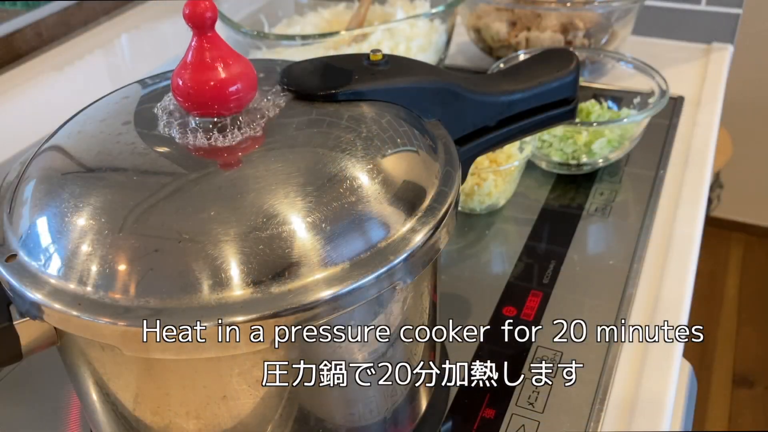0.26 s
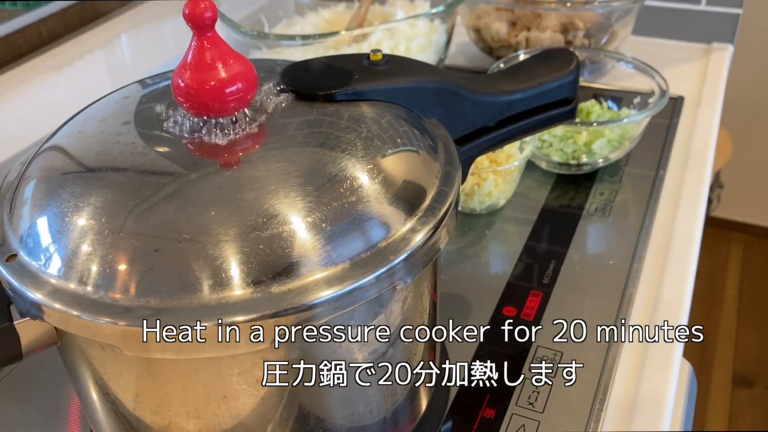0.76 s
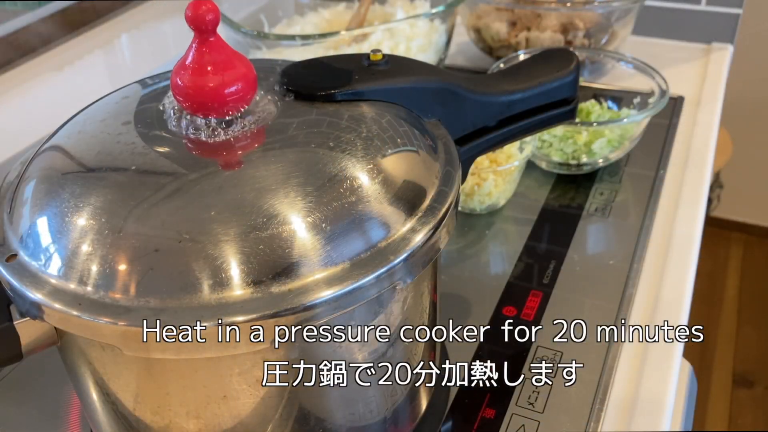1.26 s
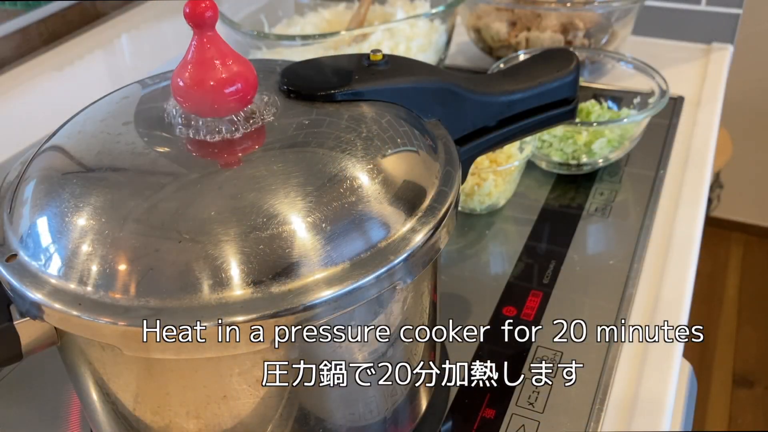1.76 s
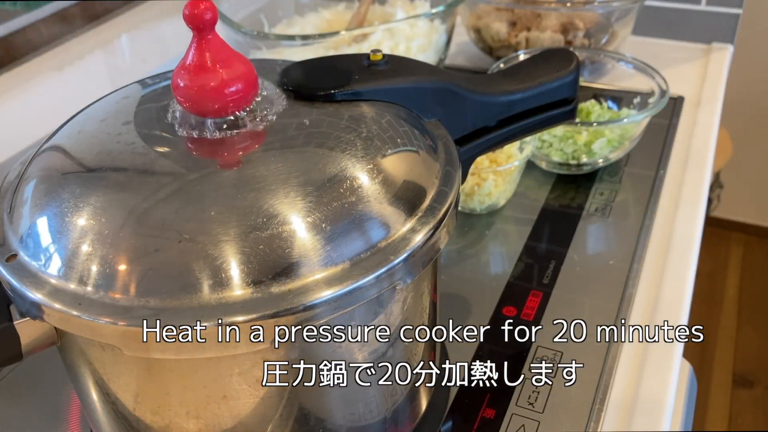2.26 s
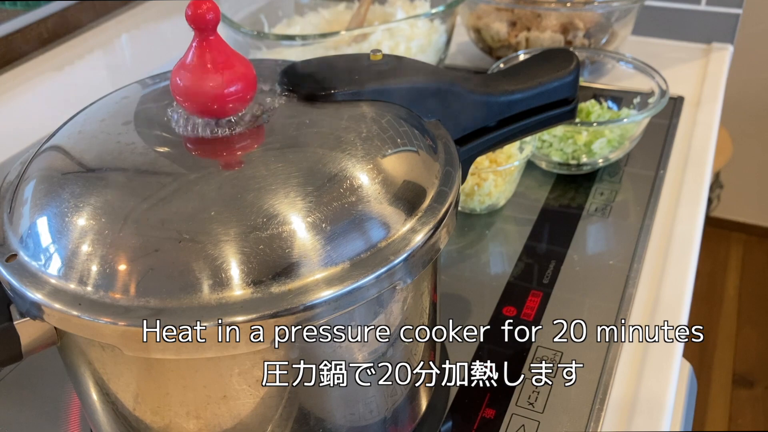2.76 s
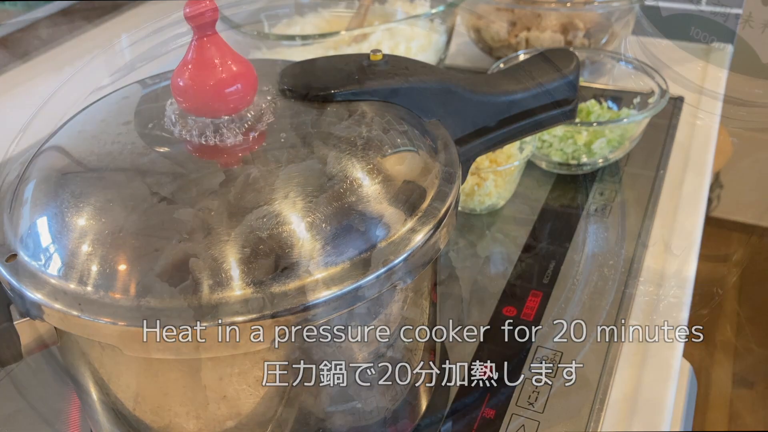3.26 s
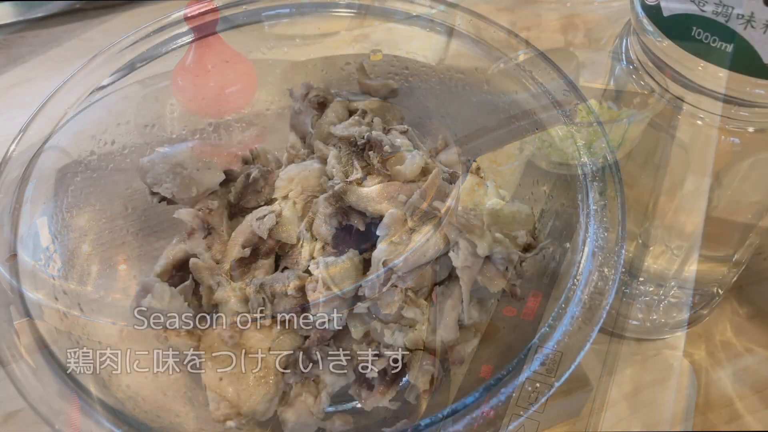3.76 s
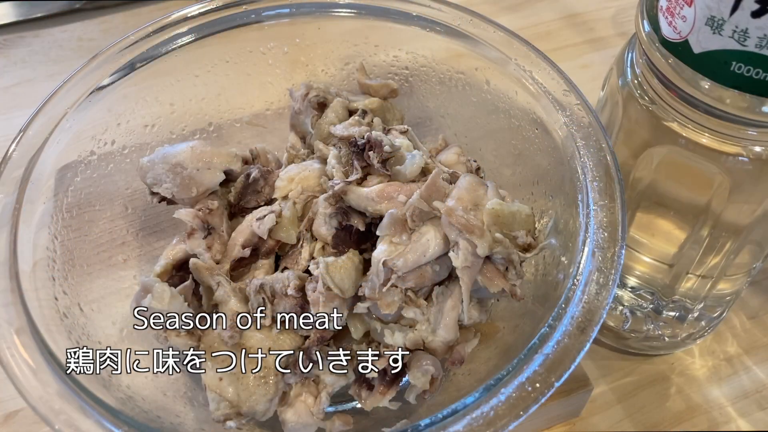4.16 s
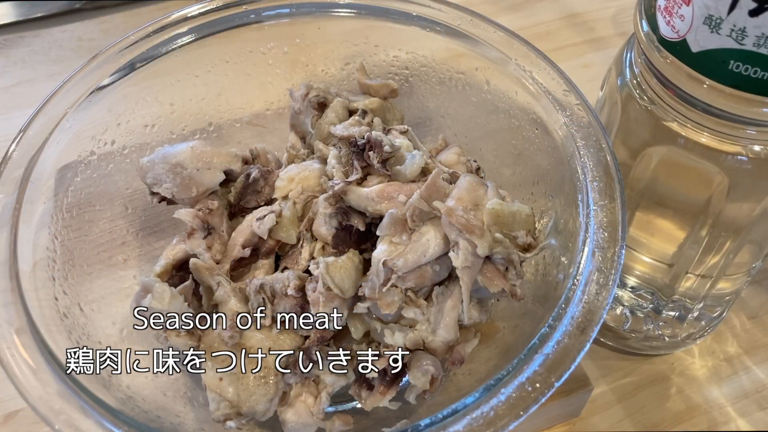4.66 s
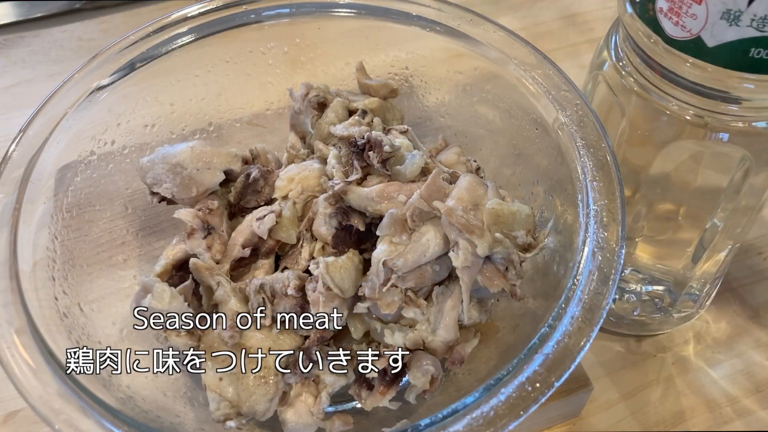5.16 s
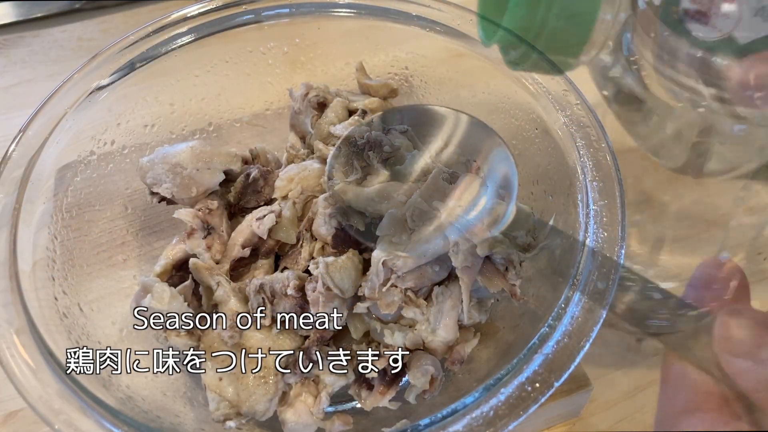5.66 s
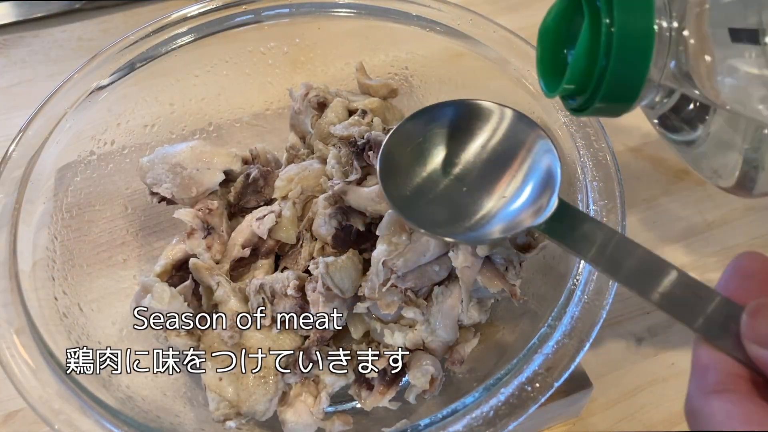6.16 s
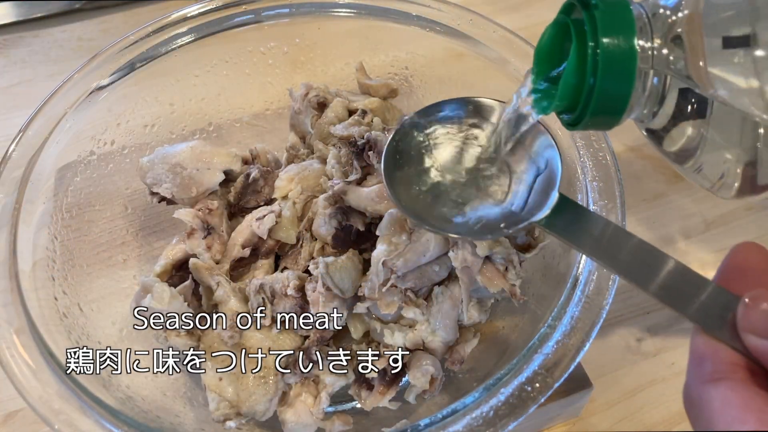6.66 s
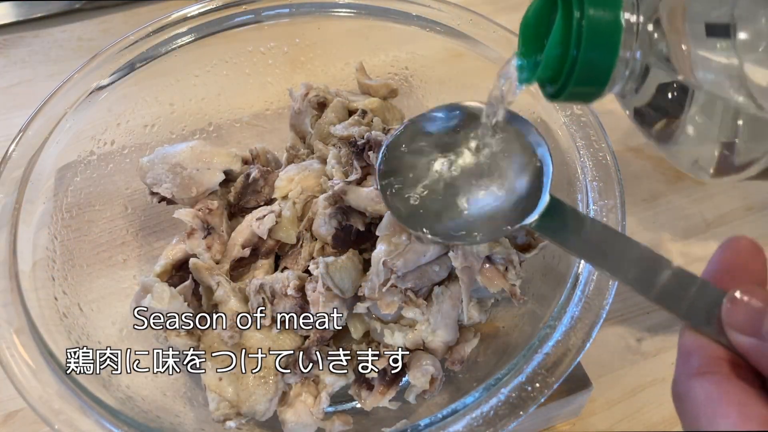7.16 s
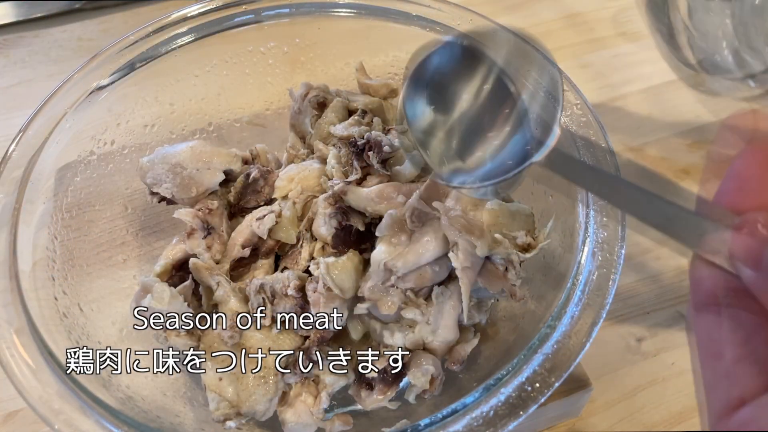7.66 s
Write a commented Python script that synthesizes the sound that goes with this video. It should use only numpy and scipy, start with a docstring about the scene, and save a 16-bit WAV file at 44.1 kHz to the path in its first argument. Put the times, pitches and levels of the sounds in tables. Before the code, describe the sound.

Rapid chattering steam jets, bubbly and sizzling, fill the first few seconds beside a hob, with occasional sharper spits. They die out and a low ventilation hum remains, slightly fuller. One sharp plastic snap follows with a small hollow bottle thud and short room reflections. Near the end, faint pouring and tiny ringing drips give way to a brief splash onto meat in a glass bowl. Close handheld phone pickup, indoors.

```python
"""A pressure cooker's weight rocks on its vent 11 to 14 times a second; noise jets pulse as wet puffs, then fade.
A flip cap then creaks and snaps open: slips excite its damped modes, and the bottle answers with a soft thump.
Last, liquid is poured into a steel spoon and tipped onto meat in a glass bowl: ringing bubbles and pattering noise.
Fan noise and motor tones of a small kitchen run throughout, heard by a phone's two microphone ports."""
import sys
import numpy as np
from scipy import signal
from scipy.fft import rfft, irfft
from scipy.io import wavfile

SR = 44100
rng = np.random.default_rng(int(sys.argv[2]) if len(sys.argv) > 2 else 0)


def store_wav(level_fs):
    """Save 16-bit WAV to argv[1]."""
    pcm = np.round(np.clip(np.atleast_2d(level_fs), -1, 1) * 32767)
    wavfile.write(sys.argv[1], SR, pcm.T.astype(np.int16))


N = 349272
T, HZ = np.arange(N) / SR, np.fft.rfftfreq(N, 1 / SR)
SIDES = np.array([[1], [-1]])  # left, right
TOP_HZ = 11900

# steam at a lift: start_s, flow_db, wetness_db (body over hiss), lean_db (extra opening to one side)
PRESSURE = [(0, -26.5, -5, -2), (0.33, -35, -5, 2), (0.46, -36.5, -3, -0.5), (0.74, -35.5, -6.5, 2),
            (0.95, -39.5, -8.5, -2.5), (1.4, -37, -9.5, -2), (1.55, -33.5, -7, 1.5), (1.79, -37, -7.5, 4.5),
            (1.9, -34, -2, 2.5), (2.15, -36.5, -4, 0), (2.6, -35.5, -8, -1), (3.1, -37, -6.5, 1),
            (3.3, -36.5, -7.5, 1.5), (3.76, -40.5, -3, -0.5), (3.85, -52.5, -4, 0.5)]
# runs of liquid into the spoon, over its rim, onto the meat: start_s, rel_level_db, hold_s, t60_s
RUNS = [(6.449, -80, 0.65, 0.2), (7.164, -66.5, 0.066, 0.35), (7.332, -52, 0.0067, 0.33),
        (7.381, -53, 0.11, 0.8)]


def steam(hiss_db=-0.14, body_db=-0.14, gurgle_db=-18.5, gurgle_follow=0.74, froth_db=-6, spit_db=5):
    """Each lift of the weight opens the jet; water caught in the gap froths, spits and gurgles."""
    # leak between lifts: time_s, rel_hiss_db, rel_body_db
    leak = [(0, -60, -51.5), (3.2, -73, -51.5), (3.85, -60, -64), (4.05, -74, -76)]
    # weight jumps high or hangs open: peak_s, rel_hiss_db, rel_body_db, half_length_s
    gushes = [(0.697, -38, -45, 0.013), (1.142, -36.5, -44, 0.018), (1.586, -38, -39, 0.029),
              (1.87, -42, -44, 0.015), (2.053, -26, -34, 0.01), (2.472, -30, -36, 0.013),
              (2.782, -33, -34.5, 0.018), (2.857, -26, -36, 0.011), (2.924, -27, -36.5, 0.016)]
    # jet colours: freq_hz, rel_level_db
    hiss_outline = [(3300, -37), (4600, -15), (5400, -2), (6700, 2), (7300, 2.5), (8500, 6.5), (10000, 2),
                    (11400, -2), (12000, -26)]
    body_outline = [(1500, -13.5), (2100, -10), (2450, 3.5), (3200, 0.5), (3900, -1), (4600, -4.5),
                    (5500, 4.5), (7000, -38)]
    gurgle_outline = [(150, -21.5), (400, -7.5), (700, -4), (1200, 2.5), (1900, 1.5), (2600, 1),
                      (4000, -52.5)]
    # resonances of vent and weight: freq_hz, width_hz, rel_level_db
    vent_peaks = [(2396, 50, 5.5), (2871, 46, 9.5), (3340, 38, -1), (3570, 95, -2), (4484, 25.5, 18.5),
                  (4940, 29, 10), (6630, 34, -8)]
    # stereo balance: freq_hz, left_minus_right_db
    steam_pan = [(400, 2.5), (1100, -1.5), (2300, -5), (2900, -3.5), (3600, 1), (4500, 1), (6000, 0)]
    # sharp spits at the start of a lift: start_s, rel_level_db
    spit_hits = [(0.145, -19), (1.522, -24), (1.965, -33), (2.044, -16), (2.123, -27), (2.4625, -13),
                 (2.468, -14), (2.76, -19), (2.847, -26), (3.503, -26), (3.671, -26)]
    # spit colour: freq_hz, rel_level_db
    spit_outline = [(400, -11), (1300, -12), (2700, -21), (4500, -36), (7000, 2), (9000, 3), (10500, 12),
                    (12000, -7)]
    open_share, shut_share = 0.88, 1.08  # a puff rises faster than it dies: flanks as shares of half-length

    hiss_power = amp(curve(leak)) ** 2
    body_power = amp(curve(leak, axis=2)) ** 2
    for peak_s, high_db, low_db, half_s in lifts() + list(gushes):
        flank_s = half_s * np.where(T < peak_s, open_share, shut_share)
        opening = 1 / np.cosh(np.clip((T - peak_s) / flank_s, -20, 20))
        hiss_power = hiss_power + (amp(high_db) * opening) ** 2
        body_power = body_power + (amp(low_db) * opening) ** 2

    jet_noise = spread(fizz(rate_hz=2700, scatter_db=2.0, smooth_db=0.0), steam_pan)
    jet = unit(colour(jet_noise, hiss_outline, vent_peaks))
    vent_noise = spread(fizz(rate_hz=900, scatter_db=2.5, smooth_db=0.5), steam_pan)
    vent = unit(colour(vent_noise, body_outline, vent_peaks))
    water_noise = spread(fizz(rate_hz=500, scatter_db=1.0, smooth_db=1.5), steam_pan)
    water = unit(colour(water_noise, gurgle_outline))
    bubbles = froth((0, leak[-1][0]), low_hz=2302, high_hz=6920, cycles=297, scatter_db=18, count=900)
    foam = spread(bubbles, steam_pan)

    hiss = amp(hiss_db) * jet * hiss_power ** .5
    body = (amp(body_db) * vent + amp(froth_db) * foam) * body_power ** .5
    # the low gurgle swells less than the jet does
    gurgle = amp(gurgle_db) * water * body_power ** (gurgle_follow / 2)
    spits = ring(strikes(*np.transpose(spit_hits)), burst(0.013, spit_outline))
    # the changing shape of the gap keeps puffs from sharing a colour
    return flutter(hiss + body + gurgle, depth_db=3.5, rate_hz=28) + amp(spit_db) * spits


def lifts(uneven_db=0.48):
    """One puff per lift, following steam flow and wetness: peak_s, hiss_db, body_db, half_length_s."""
    half_s = 0.017  # widest to 65% open, before the flanks are skewed
    peak_s, side = lift_times()
    at_s, *columns = np.transpose(PRESSURE)
    flow_db, wet_db, lean_db = (np.interp(peak_s, at_s, column) for column in columns)
    hiss_db = flow_db + side * lean_db + uneven_db * rng.standard_normal(len(peak_s))
    return [(s, db, db + wet, half_s) for s, db, wet in zip(peak_s, hiss_db, wet_db)]


def lift_times():
    """Moments at which the rocking weight is widest open, and the side (+1 or -1) it tips to."""
    # rocking of the weight: time_s, lift_rate_hz
    rocking = [(0.0, 13.32), (0.3, 12.46), (0.55, 13.36), (1.25, 13.42), (1.5, 10.84), (1.75, 12.06),
               (2.1, 12.26), (2.4, 12.26), (2.9, 13.43), (3.3, 13.68), (3.8, 12.13)]
    first_lift_s = 0.005
    # the weight slowly circles the vent: lifts to one side come early, to the other late
    limp_s, circling_s = 0.0075, 3.87
    rocking_s = T[T < PRESSURE[-1][0]]
    turns = np.cumsum(curve(rocking)[:len(rocking_s)]) / SR
    k = np.arange(int(turns[-1]) + 1)
    even_s = np.interp(k, turns, rocking_s) + first_lift_s
    side = (-1) ** k
    return even_s + side * limp_s * np.sin(2 * np.pi * even_s / circling_s), side


def flutter(x, depth_db, rate_hz, count=14):
    """Turbulence: each stretch of the spectrum rises and falls on its own."""
    spectrum, out = rfft(x), 0
    place = np.minimum(np.sqrt(HZ / TOP_HZ), 1) * (count - 1)
    for k, steps in enumerate(rng.standard_normal((count, 1000))):
        band = irfft(spectrum * np.maximum(1 - abs(place - k), 0), N)
        wander = np.interp(T * rate_hz, np.arange(len(steps)), steps)
        out = out + band * amp(depth_db * wander)
    return out


def cap(crack_db=-2, crack_t60_s=0.0058, push_s=0.0018, thud_db=-7,
        plastic_wet_db=-20, crack_wet_db=7, thump_wet_db=-11, thud_wet_db=-5):
    """The plastic cap cracks free and rings; the released bottle answers with a soft thump."""
    # the cap creaks, lets go and swings back: start_s, rel_ring_db, rel_crack_db
    snaps = [(4.7025, -15, -47), (4.7058, -9.5, -40), (4.7088, 4.5, -38), (4.7101, -36, 0),
             (4.7128, -4.5, -15), (4.7485, -22, -30), (4.869, -34, -42), (4.876, -30, -35),
             (4.885, -36, -36), (4.901, -29, -38), (5.065, -55, -39)]
    # modes of cap and bottle: freq_hz, rel_level_db, t60_s, left_minus_right_db
    cap_modes = [(732, -30, 0.064, 2), (1060, -46, 0.034, -20), (1370, -18, 0.042, -13),
                 (1770, -32, 0.027, -2), (1900, -27, 0.031, 11), (2156, -15, 0.052, -10.5),
                 (2520, -20.5, 0.029, -13), (2770, -24.5, 0.02, 10.5), (3660, -37, 0.0088, -19),
                 (4300, -27, 0.029, 4), (5070, -26.5, 0.069, -5.5), (5460, -40, .02, 19),
                 (7800, -36, 0.055, 12)]
    bottle_modes = [(130, -46, 0.11, 0), (209, -14.5, 0.031, 0), (227.6, -31, 0.28, 1),
                    (284, -41, 0.06, 0.89), (343, -47, .08, 1), (400, -29, 0.18, 1), (507, -49, 0.049, 1)]
    # colour of the crack: freq_hz, rel_level_db
    crack_outline = [(500, -4), (1300, -3.5), (2300, 4.5), (3000, -3), (3700, -14), (5400, -12),
                     (6800, -16), (7800, -6), (8800, -7), (10000, 6), (10800, 12.5), (12000, -17)]
    # hand and worktop under the bottle: freq_hz, rel_level_db
    thud_outline = [(35, -32), (90, -17), (160, 3), (260, -4), (400, -5.5), (700, 2), (1500, -25.5)]
    thump_s = 4.7135

    snap_s, ring_db, slip_db = np.transpose(snaps)
    slips = strikes(snap_s, slip_db + crack_db)
    crack = ring(slips, burst(crack_t60_s, crack_outline))
    plastic = ring(strikes(snap_s, ring_db), modes(cap_modes))
    push = np.sin(np.pi * np.clip((T - thump_s) / push_s + .5, 0, 1)) ** 2
    push = push / push.sum()
    thump = ring(push, modes(bottle_modes))
    thud = amp(thud_db) * ring(push, burst(0.052, thud_outline))
    # each part sends its own share into the room; heard from all sides, the crack has a smooth colour
    high = amp(plastic_wet_db) * plastic + amp(crack_wet_db) * colour(slips, crack_outline)
    low = amp(thump_wet_db) * thump + amp(thud_wet_db) * thud
    return plastic + crack + thump + thud + kitchen(high + low, wet_db=3.0)


def pour(drop_db=-1, tick_db=-7, flow_db=-2, bubbles_db=1):
    """Drops tick and ring in the spoon; the spill patters over the meat in tiny bubbles."""
    # drops and bubbles: start_s, rel_level_db, initial_pitch_hz
    drop_list = [(6.934, -31.5, 3980), (7.0065, -44.5, 8090), (7.11, -37, 2800), (7.1955, -48, 7890),
                 (7.2094, -38, 6800), (7.231, -27.5, 2350), (7.2877, -43, 2000), (7.3226, -43, 10200),
                 (7.3416, -34, 8400), (7.3872, -23.5, 5350), (7.439, -36, 6700), (7.472, -36, 7200),
                 (7.4917, -33, 2660), (7.5287, -38, 8510)]
    # splash colour: freq_hz, rel_level_db
    splash_outline = [(600, -17), (1500, 1), (3000, -4), (4200, -1), (5500, 5), (8500, -3.5), (10500, 4),
                      (12000, -11.5)]

    drops = np.zeros(N + SR)
    for start_s, level_db, hz in drop_list:
        drops[int(start_s * SR):][:SR // 20] += amp(level_db + drop_db) * bubble(hz, cycles=48)
    hit_s, hit_db, _ = np.transpose(drop_list)
    ticks = ring(strikes(hit_s, hit_db + tick_db), burst(0.004, splash_outline))
    span_s = (RUNS[0][0], T[-1])
    foam = spread(froth(span_s, low_hz=1400, high_hz=10100, cycles=30, scatter_db=11.0, count=1600))
    patter_noise = spread(fizz(rate_hz=1200, scatter_db=4.5, smooth_db=-8))
    patter = unit(colour(patter_noise, splash_outline))
    running = (patter + amp(bubbles_db) * foam) * amp(flow_db) * flow()
    liquid = running + drops[:N] + ticks
    return liquid + kitchen(liquid, wet_db=-19)


def flow():
    """Gain of the running liquid: each run starts quickly, holds and dribbles out."""
    attack_s, gain = 0.0072, 0
    for start_s, level_db, hold_s, t60_s in RUNS:
        attack = np.clip((T - start_s) / attack_s, 0, 1)
        dribble = fade(np.maximum(T - start_s - attack_s - hold_s, 0), t60_s)
        gain = gain + amp(level_db) * attack * dribble
    return gain


def bubble(hz, cycles, glide=0.065):
    """A trapped bubble's pitch rises as it decays by 60 dB over the given cycles; cut at 50 ms."""
    t, t60_s = T[:SR // 20], cycles / hz
    phase = hz * (t + glide * t * np.minimum(t / t60_s, 1))
    return np.sin(2 * np.pi * phase) * fade(t, t60_s)


def froth(span_s, low_hz, high_hz, cycles, scatter_db, count):
    """Bubbles of all sizes burst at random through a span of time; rms 1 there."""
    out = np.zeros((2, N + SR))
    length_s = span_s[1] - span_s[0]
    for k, (when, pitch, size) in enumerate(rng.random((count, 3))):
        start = int((span_s[0] + when * length_s) * SR)
        hz = low_hz * (high_hz / low_hz) ** pitch
        out[k % 2, start:][:SR // 20] += amp(scatter_db * size) * bubble(hz, cycles)
    return unit(out[:, :N]) * np.sqrt(length_s / T[-1])


def appliances():
    """Fan noise and beating motor tones, whose balance shifts from beside the hob to beside the bowl."""
    # fan and air: freq_hz, rel_density_db_per_hz
    fan_outline = [(25, -100), (45, -87.5), (80, -74.5), (130, -76.5), (220, -76), (400, -79), (570, -82),
                   (740, -80), (1050, -86), (1300, -89), (2100, -93), (3800, -103), (8500, -105),
                   (11500, -111)]
    # fan resonances: freq_hz, width_hz, rel_level_db
    fan_peaks = [(413, 5.2, -31), (438.7, 4.2, 10), (718, 8.4, 8), (949, 12, 7.5), (1055, 15, 5.5),
                 (1564, 8.5, 7), (1933, 37, 7.5)]
    # fan gain: time_s, gain_db
    fan_level = [(0, -11), (3, -6), (3.5, -8), (4, -1), (4.6, -1), (5.2, -0.5), (5.55, -5), (5.9, -2),
                 (6.5, -1.5), (7.3, -2), (7.9, -5)]
    # stereo balance: freq_hz, left_minus_right_db
    fan_pan = [(100, 7.5), (420, 3), (900, 0.5)]
    # mains and motor tones: freq_hz, hob_rms_db, bowl_rms_db
    hum_tones = [(52.7, -75, -76), (66.5, -65.5, -68), (70.7, -65.5, -68), (119.7, -64, -54.5),
                 (136.2, -69, -61), (153, -94, -77), (202, -68.5, -69), (219.6, -81, -64.5),
                 (243.3, -71.5, -76)]

    noise = spread(rng.standard_normal((2, N)), fan_pan)
    air = colour(noise, fan_outline, fan_peaks) * np.sqrt(SR / 2)
    moved = np.interp(T, [3, 3.9], [0, 1])
    hum = 0
    for hz, hob_db, bowl_db in hum_tones:
        gain = amp(hob_db) * (1 - moved) + amp(bowl_db) * moved
        hum = hum + gain * np.sin(2 * np.pi * (hz * T + rng.random()))
    return air * amp(curve(fan_level)) + np.sqrt(2) * hum


def kitchen(x, wet_db, t60_s=0.67, early_db=5, early_t60_s=0.11):
    """The room's answer: quick reflections off the worktop, then the tail."""
    # wall colour: freq_hz, rel_level_db
    walls = [(100, 8.5), (300, 4), (900, 0), (2300, 4.5), (4000, 9), (8000, 3), (11000, -23)]
    decay = (fade(T, t60_s) + amp(early_db) * fade(T, early_t60_s)) * (1 - fade(T, 0.004))
    tail = colour(spread(rng.standard_normal((2, N))) * decay, walls)[:, :SR]
    return amp(wet_db) * ring(x.mean(0), tail / np.sqrt(np.sum(tail ** 2) / 2))


def spread(pair, pan=((1000, 0),)):
    """Two unrelated signals become left and right, as alike as the ports hear them."""
    # channel likeness: freq_hz, likeness_0_to_1
    likeness = [(250, 0.93), (550, 0.5), (1100, 0.22), (2000, 0.062), (4300, 0.33), (5000, 1), (5800, 1),
                (6600, 0.87), (7500, 1), (9700, 0.98), (10400, 0.89), (10900, 0.99)]
    alike = np.clip(over_hz(likeness), 0, 1)
    mid, side = rfft(pair)
    both = mid * np.sqrt((1 + alike) / 2) + SIDES * side * np.sqrt((1 - alike) / 2)
    return irfft(both * amp(SIDES * over_hz(pan) / 2), N)


def fizz(rate_hz, scatter_db, smooth_db):
    """Two streams of tiny bursts of uneven size over smooth noise."""
    sizes = amp(scatter_db * np.minimum(rng.exponential(size=(2, N)), 5))
    bursts = (rng.random((2, N)) < rate_hz / SR) * rng.choice([-1, 1], (2, N)) * sizes
    return unit(unit(bursts) + amp(smooth_db) * rng.standard_normal((2, N)))


def burst(t60_s, points):
    """A short coloured crack of decaying noise, scaled to fixed energy."""
    crack = colour(spread(rng.standard_normal((2, N))) * fade(T, t60_s), points)[:, :SR // 10]
    return crack / np.sqrt(np.sum(crack ** 2) / 10)


def modes(table):
    """Two-channel impulse response of a body's damped modes."""
    t, out = T[:SR // 2], 0
    for hz, level_db, t60_s, pan_db in table:
        out = out + amp(level_db + SIDES * pan_db / 2) * np.cos(2 * np.pi * hz * t) * fade(t, t60_s)
    return out


def strikes(times_s, levels_db):
    """One impulse for each blow."""
    return np.bincount((np.asarray(times_s) * SR).astype(int), amp(levels_db), N)[:N]


def ring(force, response):
    """Pass a force through a two-channel impulse response."""
    return signal.fftconvolve(np.atleast_2d(force), response, axes=1)[:, :N]


def colour(x, points, peaks=()):
    """Causal minimum-phase filter from a (Hz, dB) outline, with resonances standing on it."""
    lift = 1 + sum(amp(db) / (1 + (2 * (HZ - hz) / width_hz) ** 2) for hz, width_hz, db in peaks)
    cepstrum = irfft(np.log(amp(over_hz(points)) * lift), N)
    # fold the cepstrum onto positive time
    cepstrum[1:N // 2] *= 2
    cepstrum[N // 2 + 1:] = 0
    return irfft(rfft(x) * np.exp(rfft(cepstrum)), N)


def over_hz(points):
    """Points joined on a log-frequency axis."""
    hz, value = np.transpose(points)
    return np.interp(np.log(HZ + 1), np.log(hz), value)


def curve(rows, axis=1):
    """One column of a table, joined by straight lines in time."""
    return np.interp(T, *np.transpose(rows)[[0, axis]])


def fade(t, t60_s):
    """Exponential decay, 60 dB down after t60_s."""
    return np.exp(-np.log(1000) * t / t60_s)


def amp(db):
    """Decibels to gain."""
    return 10 ** (np.asarray(db) / 20)


def unit(x):
    """Scale to rms 1."""
    return x / np.sqrt(np.mean(x ** 2))


def scene():
    """Cooker, bottle cap and pouring over the kitchen's hum."""
    return steam() + cap() + pour() + appliances()


def record(dry):
    """The phone's two ports turn the phase between channels; peaks are rounded and the top is cut."""
    # phase between ports: freq_hz, left_lead_rad
    port_phase = [(300, 0), (900, -2), (2400, -2.6), (3300, -3.1), (4200, -4), (4800, -3.2), (5400, -3.14),
                  (6200, -2.9), (7100, -.2), (9900, .1), (10800, 3.1)]
    ceiling = .8
    turned = irfft(rfft(dry) * np.exp(.5j * SIDES * over_hz(port_phase)), N)
    rounded = ceiling * np.tanh(turned / ceiling)
    return signal.sosfilt(signal.ellip(10, .2, 70, TOP_HZ, fs=SR, output="sos"), rounded)


dry = scene()
out = record(dry)
store_wav(out)
```